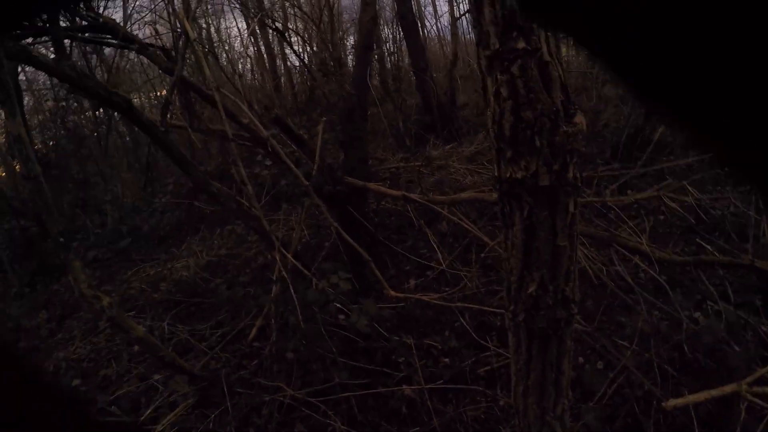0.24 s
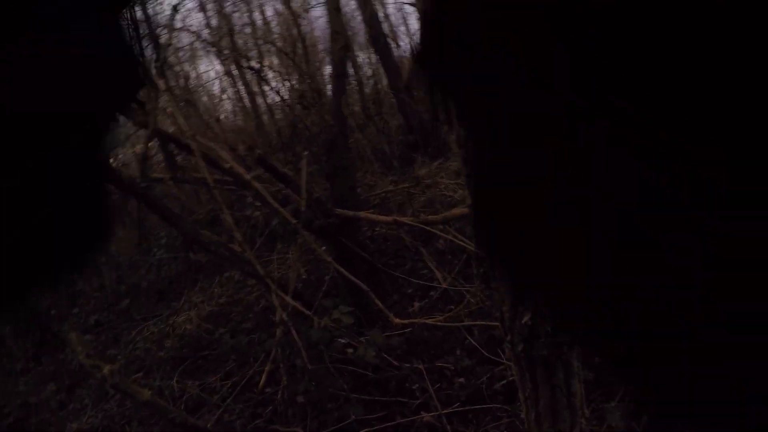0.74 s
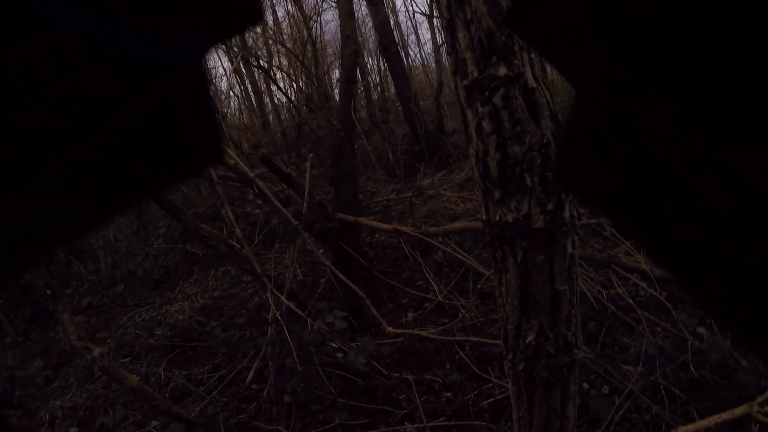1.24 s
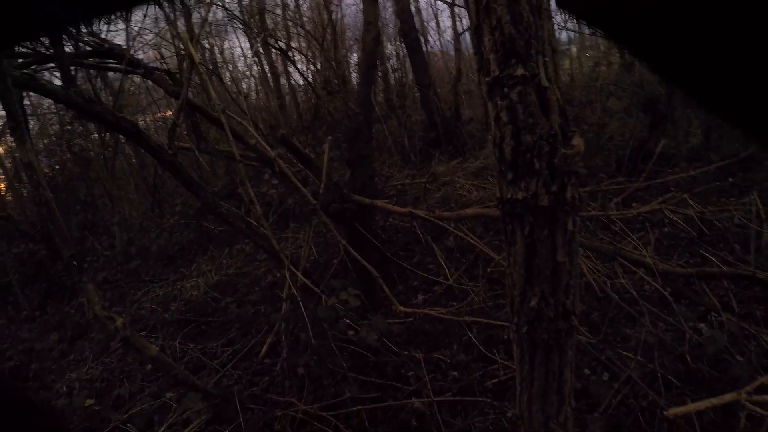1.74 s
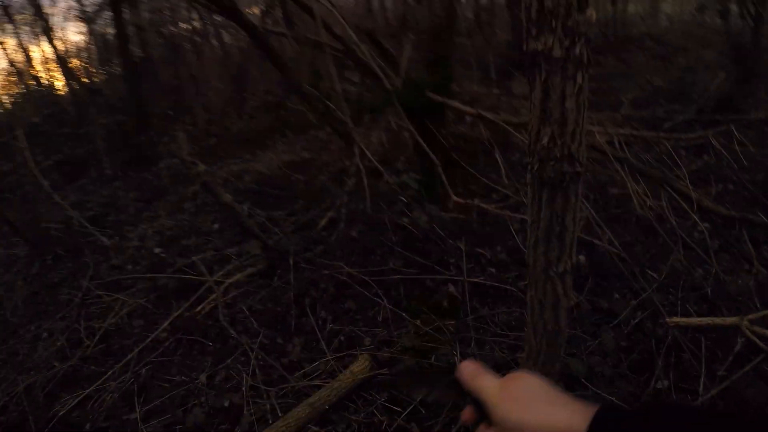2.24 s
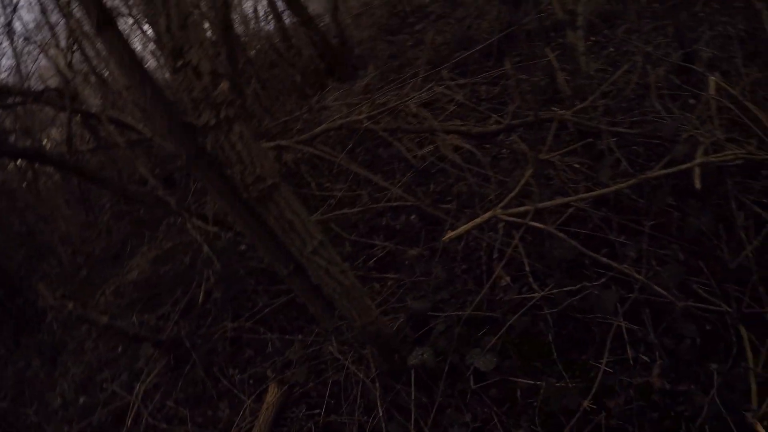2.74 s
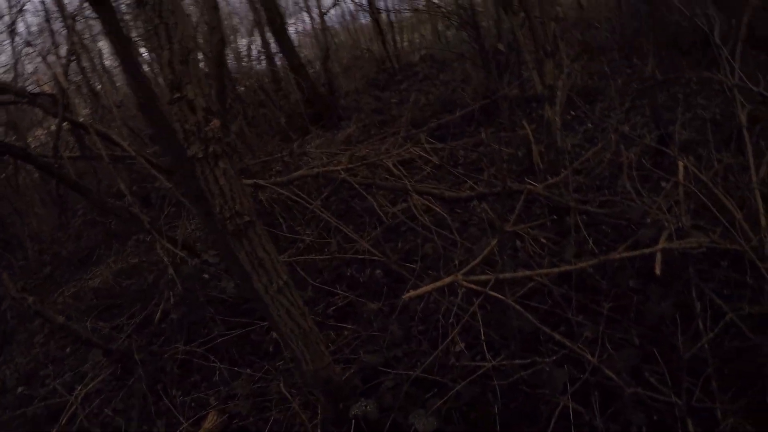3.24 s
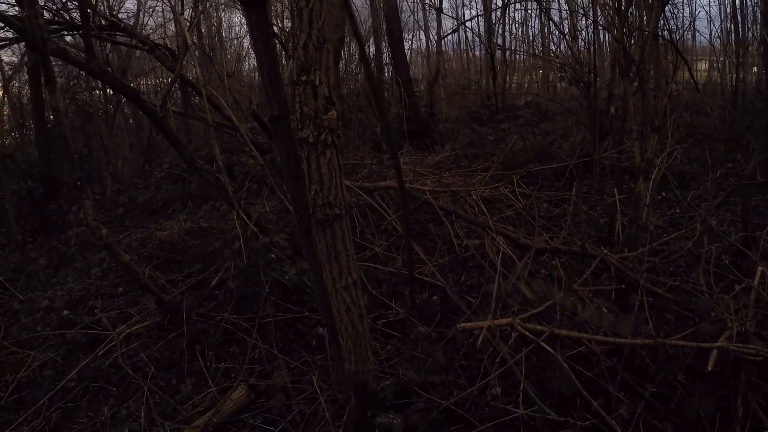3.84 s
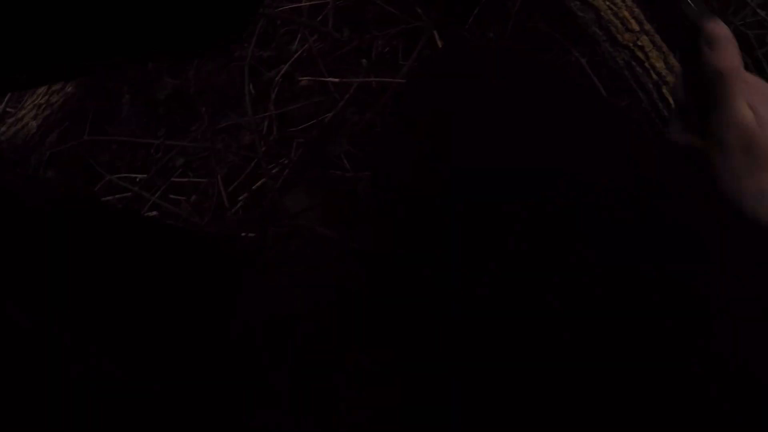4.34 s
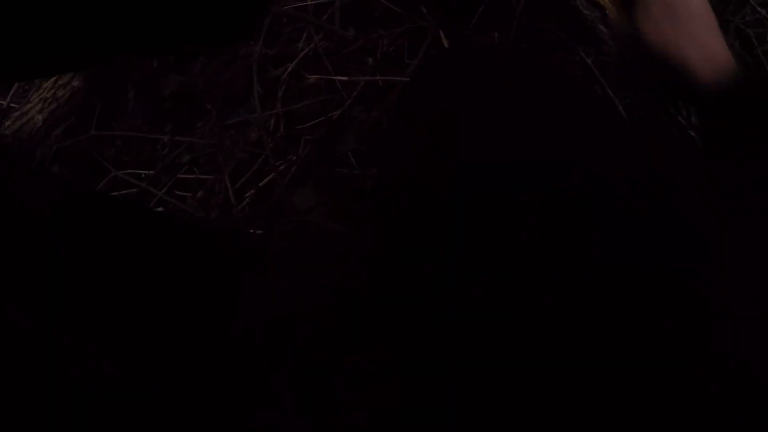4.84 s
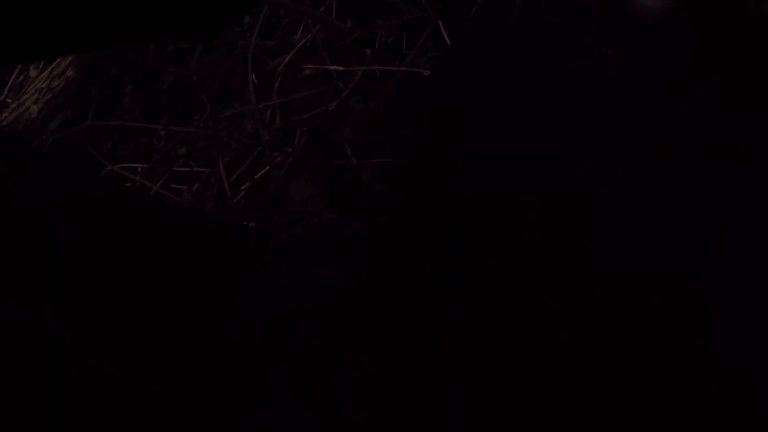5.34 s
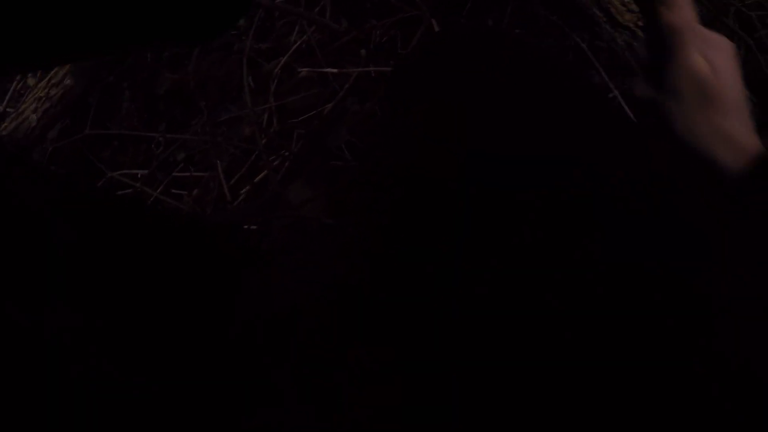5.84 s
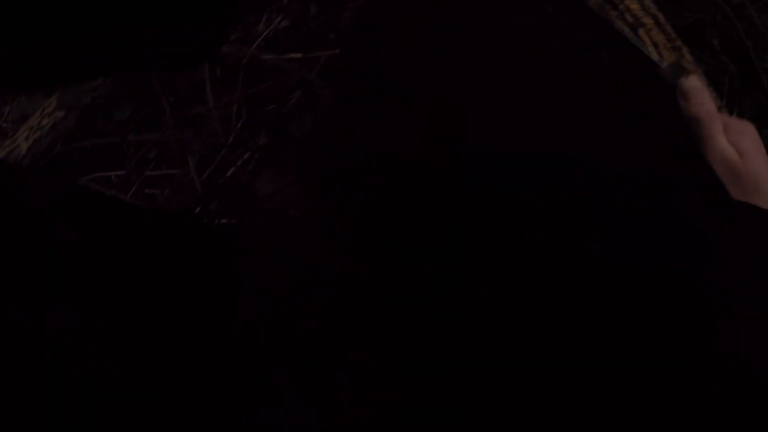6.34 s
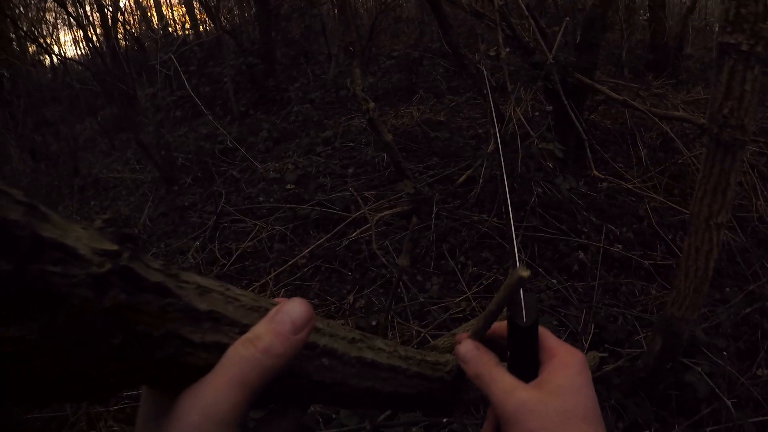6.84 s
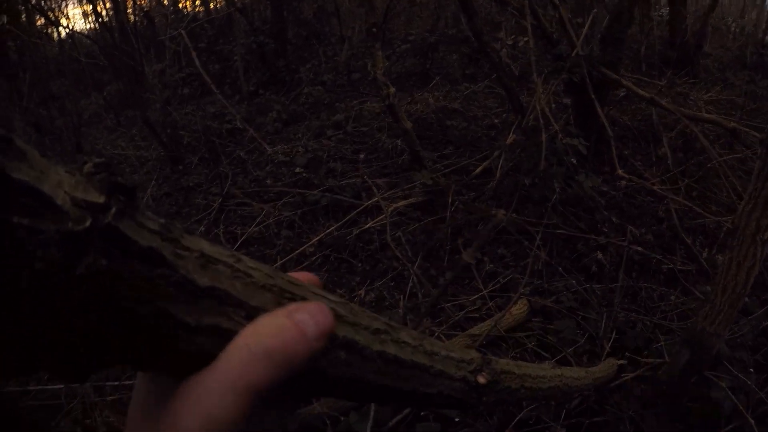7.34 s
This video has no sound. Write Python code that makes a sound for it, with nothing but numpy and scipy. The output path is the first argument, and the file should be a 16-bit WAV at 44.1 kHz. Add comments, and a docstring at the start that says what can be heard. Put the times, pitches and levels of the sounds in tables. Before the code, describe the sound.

Rhythmic sawing in a quiet wood, splintering cracks and crackling twigs, one loud knock with low boom, five more saw strokes, then a sharp snap.

```python
"""A saw rasps through a thin dead trunk in a wood, over far traffic, heard by a microphone worn on the body.
Clicks spaced by the passing teeth are coloured into rasp, tearing hiss and woody boom. The trunk is pushed
over: noise bursts snap its fibres, the crown crackles, and ringing modes of wood and soil make a deep thud.
The saw then cuts a branch, a side twig is snapped off and the blade rings. Body movement rumbles and knocks."""
import sys
import numpy as np
from scipy import signal
from scipy.fft import rfft, irfft, next_fast_len
from scipy.io import wavfile
from scipy.ndimage import uniform_filter1d

SR = 44100
rng = np.random.default_rng(int(sys.argv[2]) if len(sys.argv) > 2 else 0)


def master(y):
    """Save y as 16-bit WAV."""
    cut = np.clip(np.atleast_2d(y).T, -1, 1)
    pcm = np.round(cut * 32767)  # scale
    wavfile.write(sys.argv[1], SR, pcm.astype(np.int16))


N = 334719
TIME = np.arange(N) / SR  # s

# Far road: spectrum [f/Hz, level/dB], then its swell [t/s, level/dB]
TRAFFIC_COLOUR = [(30, -6.5), (65, 0), (120, -11), (200, -17.5), (350, -13), (600, -12), (900, -10),
                  (1300, -16.5), (1800, -21), (2500, -30.5), (3500, -35.5), (5000, -42.5), (9000, -49),
                  (15000, -55)]
TRAFFIC_SWELL = [(0, -45), (1, -48.5), (1.8, -48.5), (3, -47), (4.1, -48), (5.2, -49), (6.2, -49.5),
                 (6.8, -47.5), (7.59, -46)]
# Echo off the trunks: spectrum [f/Hz, level/dB]
FOREST_COLOUR = [(100, -9.5), (600, 19), (3000, 0.5), (8000, 3.5), (15000, -13.5)]

# Body moving behind the microphone [start t/s, end t/s, level/dB], then its rumble [f/Hz, level/dB]
SWAY_MOVES = [(.07, 0.46, -29.5), (.45, 1.95, -34), (1.97, 2.22, -24), (2.22, 2.81, -31), (3.62, 3.74, -30),
              (4.5, 6.45, -32), (7.15, 7.59, -38.5)]
SWAY_COLOUR = [(4, 4.5), (9, 15), (14, 5), (22, -2), (35, -16.5), (60, -25.5), (120, -31), (250, -42),
               (600, -71), (2000, -100)]
SWAY_REST_DB, SWAY_EASE_S = -47.5, .09  # standing still; time to start and stop moving
# Soft knocks on the microphone mount [t/s, peak level/dB], then their spectrum [f/Hz, level/dB]
MOUNT_BUMPS = [(2.071, -27), (2.138, -25), (4.401, -31), (4.64, -28.5), (6.35, -29.5)]
BUMP_COLOUR = [(20, 5), (60, 2.5), (110, -1), (180, -2), (280, -15), (600, -36), (2000, -39)]
POP_S, POP_DB = .0701, -15  # a lone dry pop: time, peak
# A full pull through the trunk jogs the mount twice: peak, lead on top speed, spacing, shortest full pull
TUG_DB, TUG_LEAD_S, TUG_GAP_S, FULL_PULL_S = -25.5, .035, .036, .15

# Crown dragging through the undergrowth as the trunk goes over [t/s, level/dB]
CROWN_FALL = [(1.7, -60), (2.0, -61.5), (2.3, -44.5), (2.46, -36.5), (2.72, -38.5), (2.98, -43),
              (3.3, -38.5), (3.8, -47.5), (4.45, -57)]
# Brief stirrings of twigs and leaves [t/s, level/dB, Gaussian spread/s]
STIRS = [(2.403, -37, .04), (4.024, -49, 0.052), (6.219, -53.5, 0.068), (6.424, -62, 0.26),
         (7.35, -61.5, 0.094), (7.59, -53, 0.039)]
# Rustle of twigs and leaves: spectrum [f/Hz, level/dB]
TWIG_COLOUR = [(150, -8.5), (350, -3), (600, 3), (1300, -5.5), (2000, -5), (2900, -2), (5000, -3),
               (8000, -5.5), (11000, -10), (15000, -17)]
LITTER_DB, LITTER_STILL_DB = -62, -69  # leaves underfoot: before the crown falls, and afterwards
# A break above the threshold shakes the crown: added gain for a 0 dB snap, dB per dB of snap, decay
SHAKE_FROM_DB, SHAKE_DB, SHAKE_PER_DB, SHAKE_T60_S = -9, 2, .27, .49

# Butt meeting the ground [t/s, knock level/dB before trim, boom level/dB, contact/s (a third of the push t60)]
BUTT_BLOWS = [(3.5762, -18, -16.5, 0.0006), (3.6143, 2.5, 1, 0.00042), (3.6222, -6, -41, 0.0011),
              (3.637, -27, -6.5, .002), (3.653, -27, -13.5, .002)]
# Soil booming under it [f/Hz, level/dB, t60/s]
SOIL_MODES = [(32.4, -0.5, 0.073), (53.3, -3, 0.12), (86, 1.5, 0.1), (148.4, -8, 0.19)]
SOIL_LAG_S = .00458
# Trunk ringing [f/Hz, level/dB, t60/s]
LOG_MODES = [(298, -3, .11), (350, -8, .07), (426, -10, .06), (515, -14, .04), (640, -3, .034),
             (840, -28, .057), (900, -25, .032), (1117, -11, .01), (1310, -0.5, .03), (1750, -1, .022)]
# Crunch of the ground: spectrum [f/Hz, level/dB]
CRUNCH_COLOUR = [(80, -5), (330, -1), (700, -2.5), (1800, -14), (4000, -13.5), (12000, -30)]

# Wood snapping [t/s, level/dB before trim, splinter f/Hz, splinter share/dB, t60/s, body level/dB before trim]
WOOD_SNAPS = [(1.353, -28.5, 9200, 19, .0053, -20), (2.006, -30, 5950, 3, 0.016, -19),
              (2.3233, -20, 3900, -2, 0.013, -12.5), (2.373, -16, 6230, 5, .029, -6),
              (2.43, -15.5, 6030, -1, 0.011, 1), (2.4598, -5.5, 5450, -4, 0.031, 1.5),
              (2.5789, 5.5, 4050, -1, .017, -7), (2.655, -16.5, 4960, 14, 0.011, -6),
              (2.7376, -20, 4960, -15, .013, 0), (2.7934, -16.5, 4020, 2, 0.0088, -19),
              (2.8235, -14, 7000, 1, .0037, -18.5), (2.8488, -9, 830, 9, .016, -5),
              (2.85, -4.5, 5500, -2, 0.013, 6), (3.0453, 3.5, 4560, -3, 0.0086, -5.5),
              (3.1351, -17, 6000, -10, 0.014, 1), (3.2082, -9, 6500, 11, 0.0084, -28),
              (3.244, -15, 6000, -10, 0.0037, -20), (3.3644, -14.5, 5000, -26, 0.0052, -6.5),
              (3.419, -19, 3120, 6, 0.01, -17), (3.5388, -12, 6170, 0, 0.0024, -10),
              (3.6141, 0.5, 4000, -10, .009, -6), (3.671, -24.5, 2100, -4, 0.024, -7),
              (3.743, -10, 6800, 11, .012, -33), (3.8207, -24.5, 5500, 7, .0066, -14),
              (4.4086, -34.5, 5960, -9, 0.033, -1), (4.872, -25, 6952, 4, 0.0085, -8),
              (4.9828, -10, 6760, -0.5, 0.0091, -4), (5.4548, -10, 5760, 0, 0.019, -7.5),
              (6.1608, -12, 6070, 15, 0.0039, -6), (6.301, -39, 3750, 8, .028, -12),
              (6.778, -37, 7000, -9, 0.0038, -9), (6.8938, -35.5, 7900, 0, .0058, -13),
              (7.0176, -23.5, 8800, 22, 0.0028, -29.5), (7.0667, -3.5, 5450, 12, .0045, -3),
              (7.0678, 0.5, 8700, 15, 0.0051, -12), (7.3272, -36.5, 5800, -3, .0042, -18)]
# Snap spectra, the tear and the low wood body [f/Hz, level/dB]
SNAP_COLOUR = [(200, -28), (1000, -17.5), (2500, 1), (5000, 2), (8000, -2.5), (11000, -6.5), (15000, -14.5)]
SNAP_BODY = [(100, -14.5), (300, 0.5), (800, -4), (1500, 1.5), (2500, -10.5), (6000, -52)]
LEAD_S = .01  # room before each break for the first fibres to give
TWIG_SNAPS = 70  # small breaks, placed at random and scaled by the stirring there
TWIG_SNAP_DB, TWIG_SNAP_SPREAD_DB = 16, 2.5  # level over the stirring before the snap trim, and its scatter
TWIG_SNAP_HZ, TWIG_SNAP_T60_S = 5200, .0078  # middle values, each scattered

# Steel blade partials [f/Hz, level/dB, t60/s]
BLADE_MODES = [(3820, -18.5, .25), (4100, -5, .15), (4165, -3, .18), (4480, -19, 0.28), (4900, -12, 0.24)]
# Jolts that ring the blade [t/s, level/dB]
BLADE_JOLTS = [(4.409, -56), (5.16, -57), (6.199, -58), (7.07, -39)]

# Push-and-pull cycles, trunk then branch
# [push starts t/s, pull starts t/s, pull ends t/s, pull level/dB, woody body level/dB re pull]
TRUNK_STROKES = [(.06, 0.264, .46, -36, -0.5), (.465, .675, .87, -38.5, -3), (.88, 1.08, 1.29, -43, 3.5),
                 (1.29, 1.495, 1.685, -43.5, -1.5), (1.69, 1.953, 2.025, -41, -3.5)]
BRANCH_STROKES = [(4.44, 4.625, 4.815, -34, -6), (4.825, 5.005, 5.17, -32.5, -5),
                  (5.18, 5.365, 5.53, -32, -7), (5.54, 5.725, 5.885, -32, -7.5),
                  (5.89, 6.07, 6.225, -34, -10)]
# The arm in each cut
# [first push level/dB, its fall/(dB per s squared) as the cut opens, share of a pull gone by at top speed]
TRUNK_ARM = (-47, 3.2, .64)
BRANCH_ARM = (-44.5, .9, .5)
# Rasp of the teeth, hiss of deep tearing and boom of the wood: spectra [f/Hz, level/dB]
TRUNK_RASP = [(900, -17), (2000, -6), (3000, -5), (3800, -14.5), (5000, -4.5), (7200, 1.5), (7900, -4),
              (8700, -2.5), (10500, -7.5), (12500, -9), (15000, -17)]
BRANCH_RASP = [(900, -7.5), (2000, -3.5), (3000, -2.5), (4200, -3), (5400, 2.5), (7000, 0.5), (8400, -0.5),
               (10500, -5), (13000, -3.5), (15000, -14.5)]
TEAR_COLOUR = [(2000, -20), (6000, -15), (8800, 6), (10500, -4), (12700, 1), (15000, -21)]
TRUNK_BODY = [(40, -57), (90, 1.5), (160, -0.5), (250, -8), (380, -6.5), (600, -13), (1200, -42),
              (3000, -51)]
BRANCH_BODY = [(40, -31), (90, 4), (200, -1.5), (330, 1), (480, -1.5), (700, -13), (1300, -17),
               (3000, -20.5)]
PUSH_FASTEST, PUSH_BODY_DB = .53, -3.5  # share of a push gone by at top speed; its woody body

TOP_HZ = 15400  # upper limit of the microphone sound


def undb(db):
    """Decibels to gain."""
    return 10 ** (np.asarray(db) / 20)


def unit(x):
    """Scale to rms 1."""
    return x / np.sqrt(np.mean(x ** 2) + 1e-20)


def fade(t60, size):
    """Exponential decay, 60 dB down after t60 seconds."""
    return np.exp(-np.log(1000) * TIME[:size] / t60)


def curve(rows):
    """Rows of (s, value) joined by straight lines."""
    return np.interp(TIME, *np.transpose(rows))


def band(x, lo_hz, hi_hz, order=1):
    """Band-pass."""
    edges = [lo_hz, min(hi_hz, SR / 2 - 1)]
    return signal.sosfilt(signal.butter(order, edges, 'band', fs=SR, output='sos'), x)


def colour(x, points):
    """Minimum-phase filter through (Hz, dB) points, so that nothing sounds ahead of its cause."""
    size = 2 * next_fast_len(len(x) // 2 + 2048)
    hz, db = np.transpose(points)
    log_hz = np.log(np.fft.rfftfreq(size, 1 / SR) + 1)
    log_gain = np.log(undb(np.interp(log_hz, np.log(hz), db)))
    # folding the cepstrum forward in time gives the causal phase
    cepstrum = irfft(log_gain)
    cepstrum[1:size // 2] *= 2
    cepstrum[size // 2 + 1:] = 0
    return irfft(rfft(x, size) * np.exp(rfft(cepstrum)))[:len(x)]


def ring(modes, size=22050):
    """Impulse response of (Hz, dB, t60) modes, each a decaying sine."""
    return sum(undb(db) * fade(t60, size) * np.sin(2 * np.pi * hz * TIME[:size]) for hz, db, t60 in modes)


def walk(rate):
    """Random wander of spread near 1: Gaussian knots, rate per second, joined by lines."""
    knots = rng.standard_normal(4096)
    return np.interp(TIME * rate, np.arange(len(knots)), knots)


def clicks(rate, spread_db):
    """Random clicks, rate per second, a few of them much larger than the rest."""
    size = undb(spread_db * np.minimum(rng.exponential(size=N), 4))
    return unit((rng.random(N) < rate / SR) * size * rng.choice([-1, 1], N))


def shimmer(x, depth_db, rate, count=14):
    """Resonances that come and go: each narrow band swells and sinks on its own."""
    size = next_fast_len(N, real=True)
    spectrum, hz = rfft(x, size), np.fft.rfftfreq(size, 1 / SR)
    place = np.interp(hz, [1500, 15000], [0, count - 1])
    # triangular bands overlap and add up to the whole spectrum
    bands = (irfft(spectrum * np.maximum(1 - abs(place - k), 0), size)[:N] for k in range(count))
    return unit(sum(b * undb(depth_db * walk(rate)) for b in bands))


def add(out, start_s, sound):
    """Mix a sound in at a time."""
    i = max(int(start_s * SR), 0)
    out[i:i + len(sound)] += sound[:N - i]


def traffic():
    """A far road: smooth coloured noise, slowly swelling."""
    hum = colour(rng.standard_normal(N), TRAFFIC_COLOUR)
    hum /= np.std(band(hum, 300, 2000, order=4))  # swell levels refer to this band
    return hum * undb(curve(TRAFFIC_SWELL) + .5 * walk(4.6))


def forest(x, near_db, near_t60, far_db, far_t60, size=30000):
    """Ground and body scatter the sound in a short noise tail, the trunks in a longer, weaker one."""
    near = undb(near_db) * fade(near_t60, size)
    far = undb(far_db) * fade(far_t60, size)
    tail = rng.standard_normal(size) * (near + far)
    tail *= np.minimum(TIME[:size] / .0071, 1)  # the scatter builds up over 7.1 ms
    return x + signal.fftconvolve(x, colour(tail, FOREST_COLOUR))[:N]


def sway():
    """Deep rumble as the body moves behind the microphone: low noise following the motion."""
    rumble = colour(rng.standard_normal(N), SWAY_COLOUR)
    rumble /= np.std(band(rumble, 18, 50, order=4))  # motion levels refer to this band
    motion = np.full(N, undb(SWAY_REST_DB))
    for start, end, db in SWAY_MOVES:
        motion[(TIME >= start) & (TIME < end)] = undb(db)
    return rumble * uniform_filter1d(motion, int(SWAY_EASE_S * SR))


def bumps(size=11025):
    """Soft knocks of the body on the microphone mount, two more at each full trunk pull; and, apart from these,
    one lone dry pop."""
    out = np.zeros(N)
    envelope = fade(.094, size) * (1 - fade(.06, size))
    tugs = []
    for _, turn, end, *_ in TRUNK_STROKES:
        if end - turn > FULL_PULL_S:
            first = turn + TRUNK_ARM[2] * (end - turn) - TUG_LEAD_S
            tugs += [(first, TUG_DB), (first + TUG_GAP_S, TUG_DB)]
    for s, db in list(MOUNT_BUMPS) + tugs:
        knock = colour(rng.standard_normal(size) * envelope, BUMP_COLOUR)
        add(out, s, undb(db) * knock / np.abs(knock).max())
    add(out, POP_S, -undb(POP_DB) * fade(.083, size))
    return out


def stirring():
    """How hard twigs and leaves move: the falling crown, shaken by louder breaks, and stirs on the ground."""
    shake = np.ones(N)
    for s, db, *_ in WOOD_SNAPS:
        if db > SHAKE_FROM_DB:
            add(shake, s, undb(SHAKE_DB + SHAKE_PER_DB * db) * fade(SHAKE_T60_S, N))
    start, end = CROWN_FALL[0][0], CROWN_FALL[-1][0]
    crown = undb(curve(CROWN_FALL)) * (TIME > start) * (TIME < end) * shake
    litter = undb(np.where(TIME < start, LITTER_DB, LITTER_STILL_DB))
    stirs = sum(undb(db) * np.exp(-.5 * ((TIME - s) / spread) ** 2) for s, db, spread in STIRS)
    return np.sqrt(crown ** 2 + litter ** 2 + stirs ** 2)


def twigs(stir, size=512):
    """Dry leaves brush along as dense clicks while tiny twigs tick in short bursts of shifting colour."""
    bursts = signal.fftconvolve(np.abs(clicks(150, 2.8)), fade(.006, size))[:N]
    ticks = shimmer(bursts * rng.standard_normal(N), 4, 60)
    rustle = shimmer(clicks(7000, 2), 2, 25) + .7 * ticks
    flicker_db = 1.6 * walk(30)
    return unit(colour(rustle, TWIG_COLOUR)) * stir * undb(flicker_db)


def thud(size=22050):
    """The butt grazes the ground, lands and settles: the wood knocks at once, the soft soil booms after."""
    out = np.zeros(N)
    for s, knock_db, boom_db, contact in BUTT_BLOWS:
        push = fade(contact * 3, size)  # a longer contact gives a duller knock
        crunch = unit(colour(rng.standard_normal(size), CRUNCH_COLOUR)) * fade(.06, size)
        knock = signal.fftconvolve(ring(LOG_MODES) + crunch, push / push.sum())[:size]
        add(out, s, undb(knock_db - 4.5) * knock)
        add(out, s + SOIL_LAG_S, undb(boom_db) * ring(SOIL_MODES))
    return out


def snap(db, hz, share_db, t60, body_db, size=4096):
    """A few fibres give way, then the bundle breaks, ringing the splinter and the wood around it."""
    t = TIME[:size] - LEAD_S
    # a steep rise to the break, then the decay
    envelope = np.exp(np.log(1000) * np.minimum(t / (.26 * t60), -t / t60))
    tear, splinter, wood = rng.standard_normal((3, size)) * envelope
    crack = unit(colour(tear, SNAP_COLOUR)) + undb(share_db) * unit(band(splinter, hz / 1.11, hz * 1.1))
    crack = unit(crack) + undb(body_db - 7.5) * unit(colour(wood, SNAP_BODY))
    return undb(db - 4.5) * crack * np.sqrt(np.mean(envelope ** 2))


def snaps(stir):
    """The loud breaks in turn, and small twigs giving way at random, as loud as the stirring allows."""
    out = np.zeros(N)
    for s, *settings in WOOD_SNAPS:
        add(out, s - LEAD_S, snap(*settings))
    scatter = rng.standard_normal((TWIG_SNAPS, 3))
    for place, (size, pitch, length) in zip(rng.random(TWIG_SNAPS), scatter):
        i = int(place * N)
        db = TWIG_SNAP_DB + TWIG_SNAP_SPREAD_DB * size
        hz = TWIG_SNAP_HZ * 2 ** (.4 * np.clip(pitch, -2, 2))
        t60 = TWIG_SNAP_T60_S * 2 ** (.5 * length)
        add(out, TIME[i] - LEAD_S, stir[i] * snap(db, hz, share_db=2.5, t60=t60, body_db=-11.5))
    return out


def blade(cuts):
    """The steel sings faintly under the teeth, and rings when the stroke stops or the saw is jarred."""
    jolts = np.zeros(N)
    for s, db in BLADE_JOLTS:
        add(jolts, s, undb([db]))
    # above the few clear partials lie many close ones that blur into a sizzle
    sizzle = unit(band(rng.standard_normal(22050), 5000, 11500, order=2)) * fade(.15, size=22050)
    return signal.fftconvolve(undb(-52) * cuts + jolts, ring(BLADE_MODES) + undb(-4) * sizzle)[:N]


def strokes(cycles, arm):
    """Each cycle is a light sliding push and a biting pull: (start, fastest, end, level, body)."""
    first_push_db, easing, pull_fastest = arm
    for start, turn, end, db, body_db in cycles:
        push_db = first_push_db - easing * (start - cycles[0][0]) ** 2
        yield start, start + PUSH_FASTEST * (turn - start), turn, push_db, PUSH_BODY_DB
        yield turn, turn + pull_fastest * (end - turn), end, db, body_db


def saw(strokes, rasp, body, bite, tooth_hz, tooth_depth, grain_db, snag_db, shimmer_db, tear_db):
    """Each stroke speeds up and slows down; passing teeth tear bunches of fibres and shake the wood."""
    speed, force, tearing, boom = np.zeros((4, N))
    for start, fastest, end, db, body_db in strokes:
        travel = np.interp(TIME, [start, fastest, end], [0, .5, 1])
        stroke = np.maximum(np.sin(np.pi * travel), 0)
        speed = np.maximum(speed, stroke)
        # a hard stroke digs in mostly at mid travel, a light one slides evenly
        dig = np.clip(bite + .055 * (db + 34.5), 0, 1)
        push = undb(db) * ((1 - dig) * stroke ** 1.05 + dig * stroke ** 4)
        force += push
        tearing += push * dig * stroke ** 2
        boom += push * undb(body_db)
    # count of teeth gone by; tooth_hz is the mean rate at top speed
    teeth = np.cumsum(tooth_hz * speed * (1 + .17 * walk(200))) / SR
    catch = unit(np.exp(tooth_depth * np.cos(2 * np.pi * teeth)) * undb(snag_db * walk(110)))
    # the blade's free length changes as it saws; random band swells stand for its shifting resonances
    fibres = shimmer(colour(clicks(14000, grain_db) * catch, rasp), shimmer_db, 18, count=26)
    # teeth that dig deep add a brighter tearing hiss
    hiss = unit(colour(clicks(9000, grain_db) * catch, TEAR_COLOUR))
    wood = unit(colour(clicks(900, 2.3) * catch, body))
    return force * fibres + undb(tear_db) * tearing * hiss + boom * wood


def scene():
    """Two cuts with the fall of the trunk between them."""
    cuts = saw(strokes(TRUNK_STROKES, TRUNK_ARM), TRUNK_RASP, TRUNK_BODY, bite=.65, tooth_hz=420,
               tooth_depth=.4, grain_db=1.9, snag_db=1.5, shimmer_db=4.2, tear_db=-2)
    cuts += saw(strokes(BRANCH_STROKES, BRANCH_ARM), BRANCH_RASP, BRANCH_BODY, bite=.3, tooth_hz=520,
                tooth_depth=.32, grain_db=1.6, snag_db=1.3, shimmer_db=2.2, tear_db=0)
    stir = stirring()
    wood = forest(snaps(stir) + thud(), near_db=-39, near_t60=.052, far_db=-53, far_t60=.22)
    background = traffic() + sway() + bumps()
    return (background + twigs(stir) + wood + blade(cuts) + cuts)[None]


def record(dry):
    """The loudest blows overload the microphone and clip; a steep low-pass cuts the top."""
    clipped = np.clip(dry, -1, 1)
    return signal.sosfilt(signal.ellip(8, .2, 70, TOP_HZ, fs=SR, output="sos"), clipped)


dry = scene()
out = record(dry)
master(out)
```